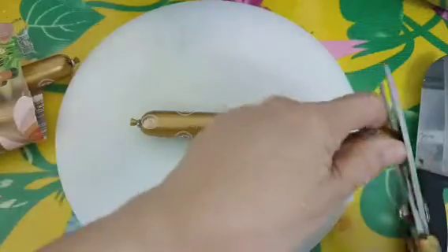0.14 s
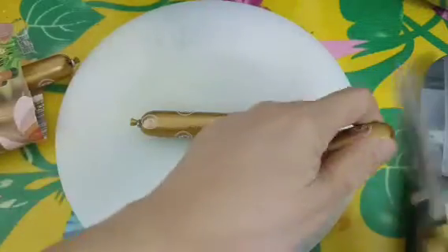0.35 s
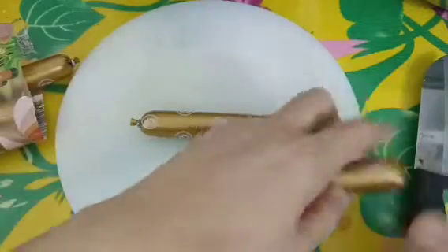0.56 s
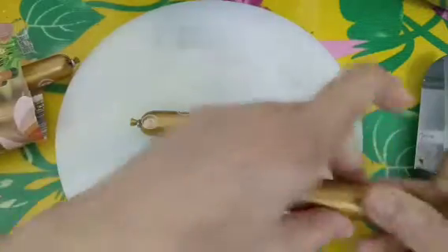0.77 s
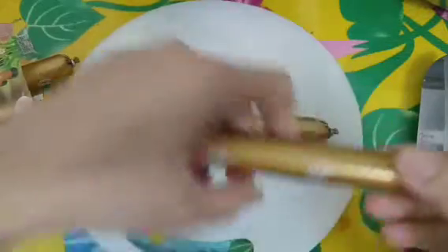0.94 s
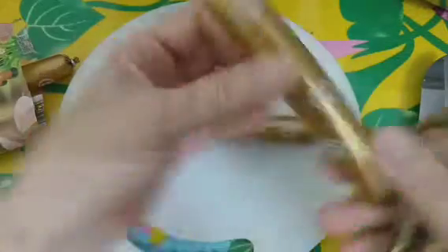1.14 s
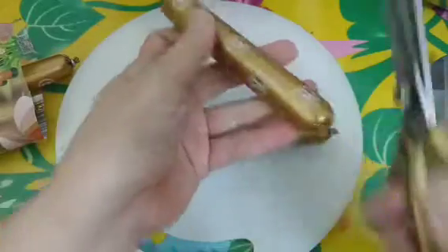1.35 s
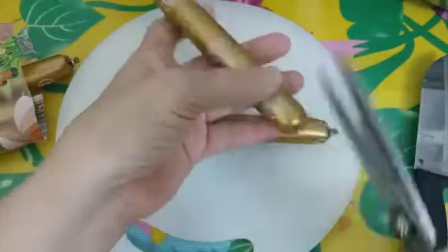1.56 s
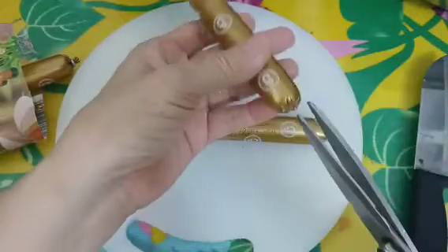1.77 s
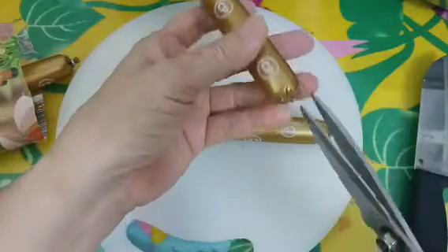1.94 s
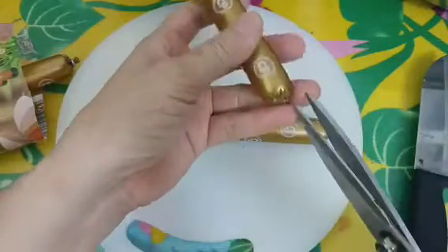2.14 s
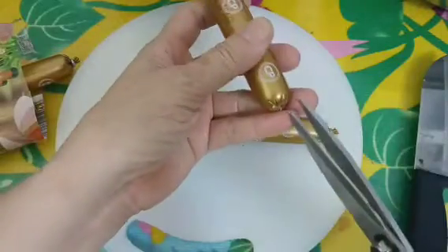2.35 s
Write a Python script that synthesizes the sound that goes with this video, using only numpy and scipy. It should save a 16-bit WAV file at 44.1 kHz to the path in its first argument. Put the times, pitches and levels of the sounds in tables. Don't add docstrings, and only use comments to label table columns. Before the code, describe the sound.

Scissors cut a thin plastic casing early on: a dry crack, then a loud metallic snap with a short bright ring. Later a faint blade clink and tiny ticks, close stereo microphone, quiet humming kitchen.

```python
import sys
import numpy as np
from scipy import signal
from scipy.fft import rfft, irfft
from scipy.io import wavfile
from scipy.ndimage import uniform_filter1d

SR = 44100
rng = np.random.default_rng(int(sys.argv[2]) if len(sys.argv) > 2 else 0)


def store_wav(level_fs):
    pcm = np.round(np.clip(np.atleast_2d(level_fs), -1, 1) * 32767)
    wavfile.write(sys.argv[1], SR, pcm.T.astype(np.int16))


def volts_from_db(level):
    exponent = np.asarray(level, float) / 20
    return 10 ** exponent


N = 105840

# start_s, bright_level_db, t60_s, body_pitch_hz, body_level_db
CASING_CRACKS = [
    (0.191, -34, 0.016, 2600, -33.5),
    (0.2085, -36, 0.043, 2500, -47),
    (0.2117, -14.5, 0.0052, 9890, -17),
    (0.213, -34, 0.032, 434, -40),
    (0.2135, -32, 0.013, 9500, -36),
    (0.2167, -30, 0.004, 14500, -30.5),
    (0.2265, -45, 0.046, 9000, -45.5),
    (0.2995, -30.5, 0.0068, 11700, -30),
    (0.3003, -32.5, 0.08, 11700, -42),
    (.303, -41.5, 0.15, 3100, -52),
]
PIVOT_SNAPS = [
    (.3438, -15, 0.014, 867, -33.5),
    (.3437, -27.5, .014, 8717, -11),
    (.344, -30, .012, 2600, -39),
    (.344, -29.5, .012, 6600, -27.5),
    (.3465, -25, 0.017, 12100, -22),
    (.352, -27, .012, 11440, -20.5),
    (.3578, -39, .015, 10530, -22),
    (.3617, -35.5, .008, 10800, -17.5),
    (.3645, -40, .02, 10680, -24),
    (.380, -43.5, .015, 9900, -26),
]
BLADE_CLINKS = [
    (1.2585, -33, 0.017, 9260, -30.5),
    (1.2588, -46, 0.025, 3545, -40.5),
    (1.2588, -52, 0.021, 2840, -44.5),
    (1.2588, -50.5, 0.032, 4840, -46),
    (1.2588, -48, 0.044, 7920, -54),
    (1.2588, -48.5, .02, 10940, -39),
    (1.2692, -60, 0.0072, 4420, -46),
    (1.2694, -60, .008, 3000, -47),
    (1.271, -58.5, 0.25, 3420, -67.5),
    (1.304, -68, 0.0074, 2560, -58),
]
BLADE_TICKS = [(1.087, -61, 0.0082, 5016, -80), (1.6338, -57, 0.011, 9330, -48.5),
               (1.6855, -54.5, 0.015, 12540, -63), (1.702, -68.5, 0.028, 3630, -57.5),
               (1.7563, -53, 0.011, 9100, -55), (1.794, -52, .012, 9900, -51),
               (1.806, -67, 0.05, 4280, -73), (1.819, -65, 0.048, 1540, -58),
               (1.812, -73, .02, 2060, -61.5), (1.845, -72, 0.029, 1510, -62.5),
               (1.868, -70, 0.014, 4200, -64), (1.873, -54, 0.009, 8650, -70),
               (1.889, -72, 0.017, 8800, -67), (2.0555, -67, 0.023, 1680, -53.5)]

# pitch_hz, level_db
CASING_COLOUR = [(250, -32), (450, -5.5), (1000, -8), (2900, -8), (5000, -10), (6800, -12.5), (8500, -4),
                 (15000, -7), (16500, -26)]
SNAP_COLOUR = [(290, -46), (500, -15.5), (2190, -31), (4620, -21), (5190, -22.5), (9460, 1), (15100, -15),
               (16500, -32)]
CLINK_COLOUR = [(600, -55), (900, -33), (3300, -12), (5200, -16), (7100, -24), (9200, 0), (11500, -10),
                (13000, -30), (16500, -36)]
TICK_COLOUR = [(2000, -35), (4500, 3.5), (7000, -34), (8300, 4), (12000, 5.5), (16000, -1), (16700, -28)]

# pitch_hz, level_db, t60_s
STEEL_MODES = [(8620, 13, .03), (9302, -5, .36), (9368, -7, .36), (9781, -1, .3), (9918, 0, .3),
               (10389, -7, .36), (10500, 0, .24), (10983, -6, .33), (11508, -4, .34), (11709, -4, .28),
               (12118, -9, .42), (12742, -5, .22), (13694, -7, .28), (14379, -11, .5)]
SHANK_MODES = [(2326, -12, .5), (2815, -8, .25), (3332, -10, .5), (4479, -6, .35), (4540, -6, .3),
               (4947, -4, .2), (5416, -10, .4), (5604, -6, .45), (5760, -4, .15), (6191, -10, .2),
               (6724, -3, .32), (6790, -4, .3), (7224, 0, .35), (7574, -5, .5)]
PLATE_MODES = [
    (861, -63, 6.5),
    (879, -58.5, 0.43),
    (857, -65, 2.2),
    (1062, -69, 0.92),
]
CLINK_MODES = [(3688, -14, .15), (7940, -8, .3), (8829, -10, .3), (9232, 0, .3), (9320, -2, .26),
               (9803, -16, .4), (10550, -10, .25), (10830, -2, .17), (11000, -6, .12)]
# pitch_hz, level_db
SHIMMER_COLOUR = [(2000, -29.5), (5000, -26), (7400, -24), (8200, -6), (9600, -0.5), (12000, -5.5),
                  (15500, -9)]

# pitch_hz, t60_s
KITCHEN_DECAY = [(300, 0.11), (1500, 1), (4000, 0.86), (9000, 0.61), (16000, 0.17)]
# pitch_hz, level_db
LOW_TONE_COLOUR = [(20, -42), (46, -25.5), (62, 1), (270, -10.5), (420, -16), (530, -19.5), (950, -23),
                   (1150, -33.5), (1950, -56.5)]
# pitch_hz, level_db
HIGH_TONE_COLOUR = [(600, -48.5), (1300, 1.5), (2000, -3), (4400, -10.5), (6200, -21.5), (7500, -28.5),
                    (8100, -16.5), (12400, -8), (15800, -11)]
# start_s, level_db
ROOM_ACTIVITY = [(0, 5), (0.202, 10), (.5, 9.5), (.8, 3.5), (1.198, 2), (1.7, 5), (2.4, 3)]
# pitch_hz, correlation
LIKENESS = [(60, 1), (180, 0.73), (550, 0.28), (1650, -0.08), (4970, -0.0), (15000, -0.029)]
# start_s, pitch_hz, level_db
ENGINE_DRONE = [(0.0, 64.5, -65), (0.06, 65.5, -52), (0.21, 62.5, -46.5), (0.27, 69.1, -61),
                (0.33, 65.8, -42), (0.75, 66.84, -56), (1.02, 66.7, -55), (1.18, 61, -70),
                (1.36, 68.23, -60), (1.61, 69.1, -51), (1.7, 66.4, -64.5), (1.77, 63.6, -54),
                (1.99, 69.6, -57), (2.059, 75.6, -74.5), (2.131, 68.2, -68), (2.4, 65.7, -67.5)]
# pitch_hz, width_hz, level_db
APPLIANCE_HUM = [(130, 48, -60.5), (159.7, 6.5, -66), (169.4, 6.95, -71), (298.1, 33, -64), (403, 4, -81),
                 (456.5, 4, -70.5), (573, 6.6, -82)]

SNAP_S, CLINK_S = 0.3438, 1.2585
CRACK_PAN_DB, SNAP_PAN_DB, CLINK_PAN_DB, TICK_PAN_DB = 1, 0.9, -3.5, 7
ROOM_EDGE_HZ = 15900


def evened(x):
    return x / np.sqrt(np.mean(x ** 2) + 1e-20)


def read(points, hz):
    f, value = np.transpose(points)
    return np.interp(np.log(hz + 1), np.log(f + 1), value)


def add(mix, start_s, sound, pan_db):
    part = mix[:, round(start_s * SR):][:, :sound.shape[-1]]
    sides = volts_from_db(np.array([[pan_db / 2], [-pan_db / 2]]))
    part += (sound * sides)[:, :part.shape[1]]


def scissors():
    out = np.zeros((2, N))
    for impacts, colour, pan_db in ((CASING_CRACKS, CASING_COLOUR, CRACK_PAN_DB),
                                    (PIVOT_SNAPS, SNAP_COLOUR, SNAP_PAN_DB),
                                    (BLADE_CLINKS, CLINK_COLOUR, CLINK_PAN_DB),
                                    (BLADE_TICKS, TICK_COLOUR, TICK_PAN_DB)):
        for start_s, *row in impacts:
            add(out, start_s, crack(colour, *row), pan_db)
    add(out, SNAP_S, ringing_steel(), SNAP_PAN_DB)
    add(out, SNAP_S, plate_and_shanks(), CRACK_PAN_DB)
    add(out, CLINK_S, volts_from_db(-54.5) * ring(CLINK_MODES, 0.8, skew=0.93), CLINK_PAN_DB)
    return out


def crack(colour, db, t60, body_hz, body_db, apart=1.2, width=0.1):
    size = 4096
    t, f = np.arange(size) / SR, np.fft.rfftfreq(size, 1 / SR)
    noise = rng.standard_normal((3, size))
    sides = noise[0] + apart * noise[1:]
    bright = evened(irfft(rfft(sides) * volts_from_db(read(colour, f)), size))
    modes_hz = body_hz * (1 + width * rng.uniform(-0.92, 1, (5, 1, 1)))
    lead = rng.standard_normal((5, 2, 1))
    body = np.sin(2 * np.pi * modes_hz * t + 0.7 * lead).sum(0)
    attack = np.sin(np.pi / 2 * np.minimum(t / 0.00033, 1)) ** 2
    fade = volts_from_db(-60 * t / t60) * attack
    burst = volts_from_db(db) * evened(bright * fade) + volts_from_db(body_db) * evened(body * fade)
    return burst * np.sqrt(np.mean(fade ** 2))


def ring(modes, seconds, skew=0.28):
    t = np.arange(round(seconds * SR)) / SR
    hz, db, t60 = np.transpose(modes)[:, :, None]
    phase = rng.random(hz.shape) * 2 * np.pi
    lead, pan = rng.standard_normal((2, *hz.shape))
    sides = []
    for k in (0.5, -0.5):
        level = volts_from_db(db + k * 0.94 * pan - 60 * t / t60)
        sides.append(level * np.sin(2 * np.pi * hz * t + phase + k * skew * lead))
    return np.sum(sides, axis=1) * np.minimum(t / 0.00029, 1)


def ringing_steel():
    count = 450
    draw = rng.random((count, 3))
    hz = 2000 + 13800 * (np.arange(count) + 2 * draw[:, 0]) / 452
    spread_db = 2.5 * (1 + (hz < 7600))
    db = read(SHIMMER_COLOUR, hz) + spread_db * np.log(draw[:, 1] + 0.02)
    t60 = 0.37 * (0.6 + 0.8 * draw[:, 2])
    shimmer = volts_from_db(-34) * ring(np.c_[hz, db, t60], 0.7, skew=2.4)
    return shimmer + volts_from_db(-26) * ring(STEEL_MODES, 0.7, skew=0.8)


def plate_and_shanks():
    return ring(PLATE_MODES, 2.06) + volts_from_db(-57) * ring(SHANK_MODES, 2.06, skew=1.1)


def kitchen(x):
    first = 160
    taps = np.zeros((2, 30000))
    at = np.arange(first, 29900, 20) + rng.integers(0, 20, (2, 1487))
    np.put_along_axis(taps, at, rng.choice([-1., 1.], at.shape), 1)
    hz, t, z = signal.stft(taps, SR, nperseg=256)
    decay = volts_from_db(-60 * t / read(KITCHEN_DECAY, hz)[:, None])
    tail = signal.istft(z * decay * (hz < ROOM_EDGE_HZ)[:, None], SR, nperseg=256)[1]
    tail[:, :first] = 0
    return signal.fftconvolve(x.mean(0)[None], tail / np.linalg.norm(tail[0]), axes=1)[:, :N]


def room_tone(colour, level_db, follow, patchy_db):
    frames, hz = N // 512 + 5, np.fft.rfftfreq(2048, 1 / SR)
    a, b, c, d, patches = rng.standard_normal((frames, 1025, 5)).T
    patches = uniform_filter1d(patches, size=16, axis=0)
    patches = evened(uniform_filter1d(patches, size=8, axis=1))
    same = np.clip(read(LIKENESS, hz), -1, 1)[:, None]
    left = a + 1j * b
    right = same * left + np.sqrt(1 - same ** 2) * (c + 1j * d)
    gain = volts_from_db(read(colour, hz)[:, None] + patchy_db * patches) * (hz < ROOM_EDGE_HZ)[:, None]
    z = np.array([left, right]) * gain
    x = evened(signal.istft(z, nperseg=2048, noverlap=1536)[1][:, 1024:N + 1024])
    activity_db = np.interp(np.arange(N) / SR, *np.transpose(ROOM_ACTIVITY))
    return x * volts_from_db(level_db + follow * activity_db)


def machines():
    t = np.arange(N) / SR
    s, hz, db = np.transpose(ENGINE_DRONE)
    phase = 2 * np.pi * np.cumsum(np.interp(t, s, hz)) / SR
    drone = np.sqrt(2) * volts_from_db(np.interp(t, s, db)) * np.sin(phase)
    hum = sum(volts_from_db(level_db) * band(N, f_hz, width) for f_hz, width, level_db in APPLIANCE_HUM)
    return drone + hum


def band(size, hz, width):
    f = np.fft.rfftfreq(size, 1 / SR)
    response = 1 / (1 + (2 * (f - hz) / width) ** 2)
    return evened(irfft(rfft(rng.standard_normal(size)) * response, size))


def scene():
    close = scissors()
    tone = room_tone(LOW_TONE_COLOUR, -57, 0.71, 1.0) + room_tone(HIGH_TONE_COLOUR, -73, 0.78, 1.0)
    return close + volts_from_db(-14) * kitchen(close) + tone + machines() * volts_from_db(np.array([[-0.3], [0.3]]))


def thinned(x):
    hz, t, z = signal.stft(x, SR, nperseg=2048, noverlap=1536)
    power = uniform_filter1d(np.log(abs(z).mean(0) + 1e-12), size=7, axis=0)
    power = uniform_filter1d(power, size=5, axis=1)
    around = uniform_filter1d(power, size=61, axis=0)
    midrange = ((hz > 1900) & (hz < 7700))[:, None]
    weak = (power < around + np.log(volts_from_db(-1.5))) & midrange
    lost = signal.istft(z * weak, SR, nperseg=2048, noverlap=1536)[1][:, :N]
    slope = np.diff(x.mean(0), prepend=0)
    level = signal.lfilter(np.r_[np.zeros(350), np.ones(512) / 512], 1, slope ** 2)
    return x - lost * np.clip(np.sqrt(abs(level)) / volts_from_db(-47) - 1, 0, 1)


def top_cut(x):
    return signal.sosfilt(signal.butter(12, 16670, fs=SR, output="sos"), x)


def record(dry):
    f = np.fft.rfftfreq(N, 1 / SR)
    tilt_db = read([(200, 0.17), (1400, 4.7), (6000, 4.6), (12000, 0.72)], f)
    ports = volts_from_db(np.array([[-0.5], [0.5]]) * tilt_db)
    heard = irfft(rfft(dry) * ports * (f < 16670), N)
    return top_cut(thinned(heard))


dry = scene()
out = record(dry)
store_wav(out)
```